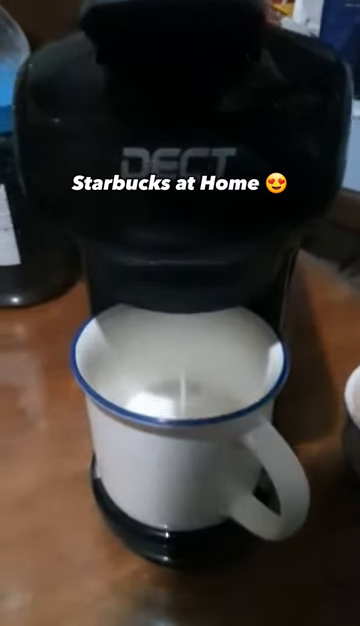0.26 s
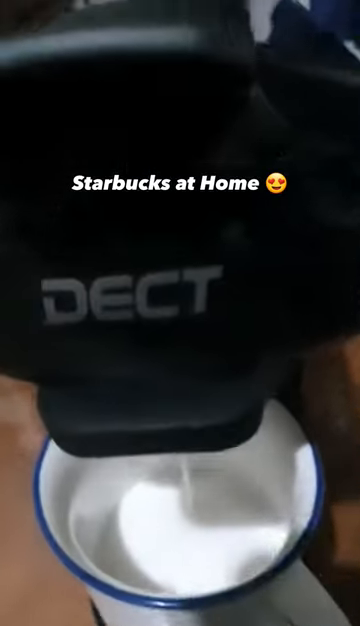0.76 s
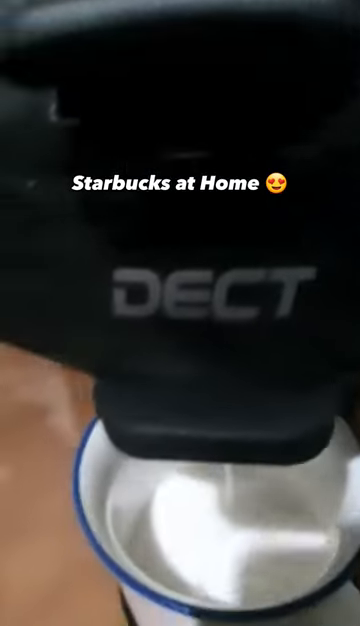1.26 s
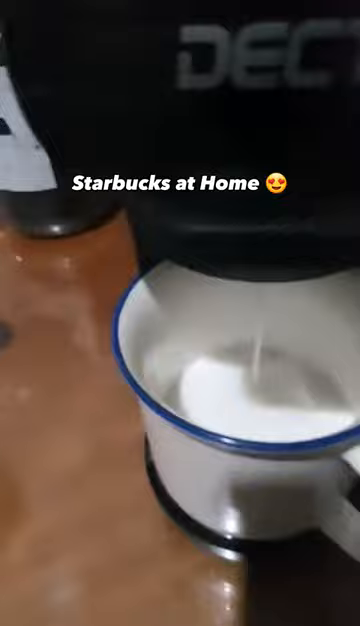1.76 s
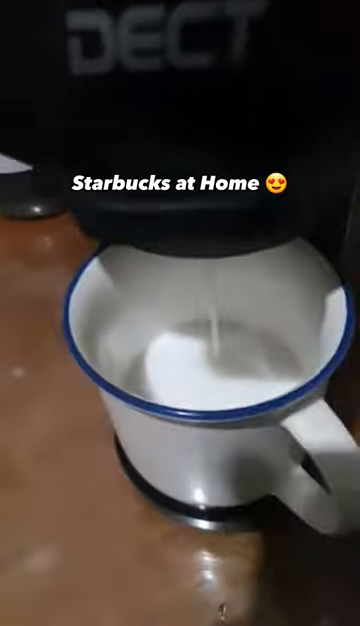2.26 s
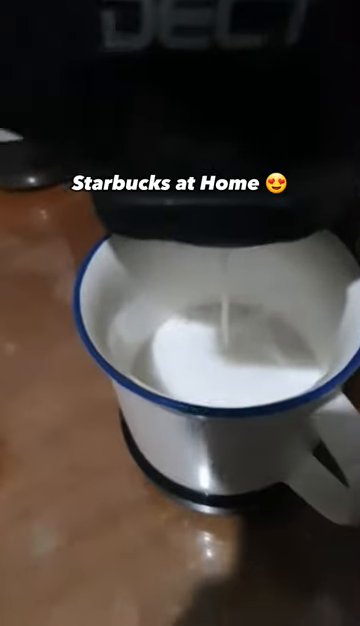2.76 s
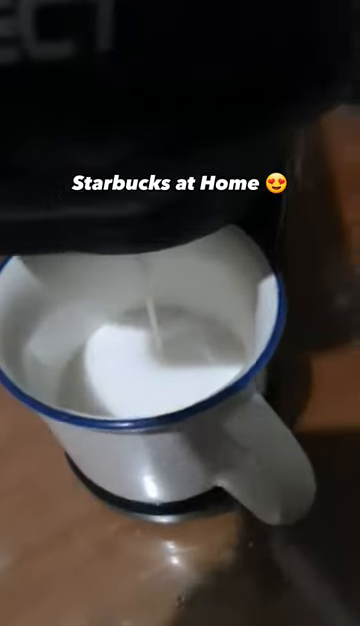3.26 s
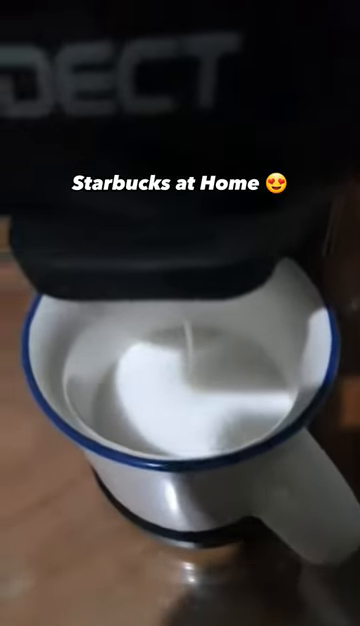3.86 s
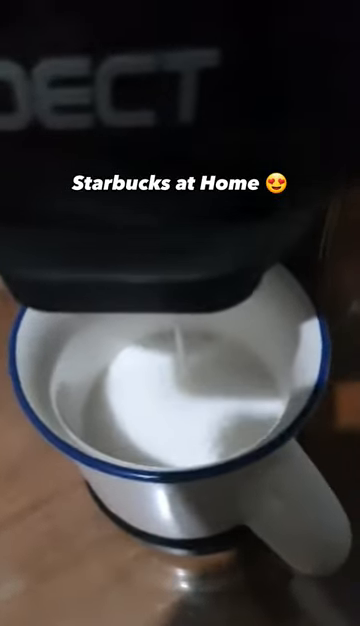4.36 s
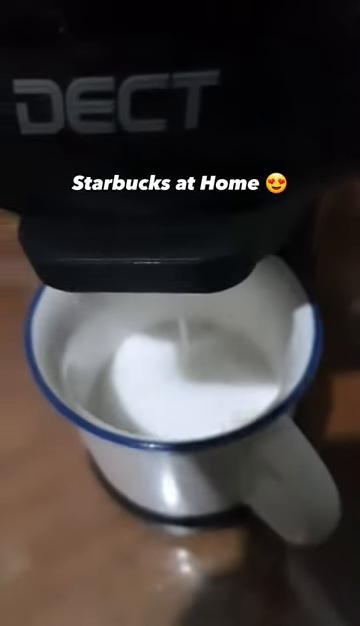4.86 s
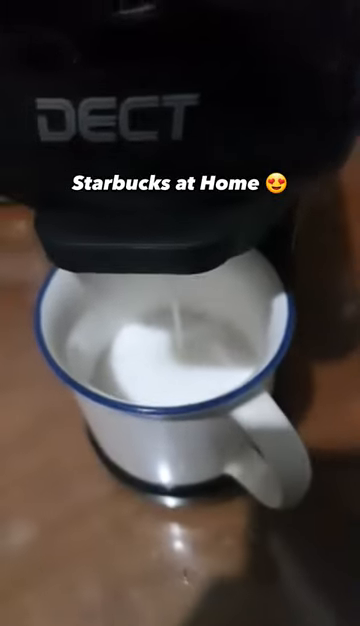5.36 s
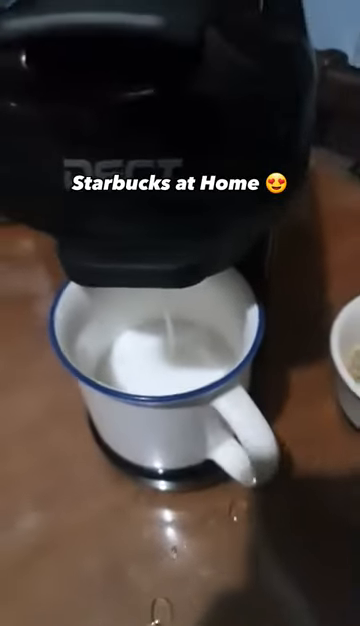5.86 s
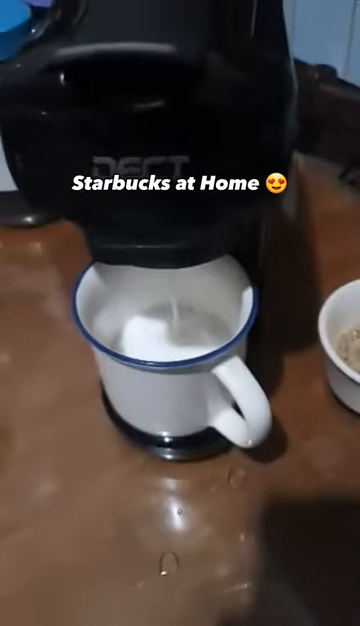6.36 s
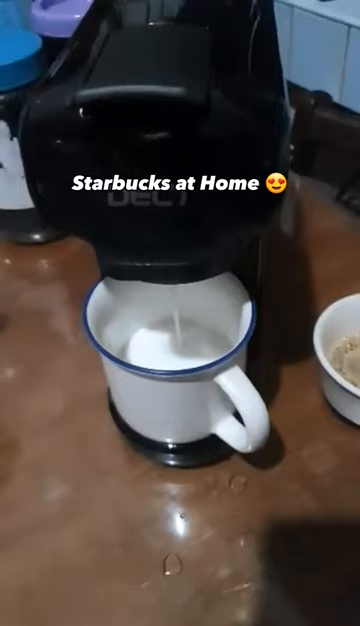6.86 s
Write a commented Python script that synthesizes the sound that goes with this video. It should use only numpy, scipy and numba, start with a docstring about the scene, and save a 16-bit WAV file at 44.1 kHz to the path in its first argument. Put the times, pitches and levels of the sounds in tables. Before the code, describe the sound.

A small coffee machine's pump buzzes steadily for the whole seven seconds, a low electric hum with a fine rattle from the housing and a faint metallic ring. Beneath it, a thin stream splashes softly into a mug. The hand-held microphone is close and moving, so the tone shifts slightly, with a faint handling rumble and soft bumps near 0.4 and 1.2 seconds. Between about 3 and 4.2 seconds, a few short plops fall into the mug, the clearest at 3.7, with faint gurgles and ticks. At 4.3 seconds, one sharp, very loud click pops on the right side of the microphone. Everything drops in level for about a second, then gradually recovers. Several dull, low bumps on the counter come between 5.7 and 6.6 seconds, the strongest near 6.1, along with faint gurgles. The buzz and trickle continue to the end.

```python
"""A vibrating pump in a small coffee machine buzzes at mains rate, each piston blow rattling the housing.
A thin stream splashes, plops and gurgles into a mug, with faint ticks and dull bumps on the counter.
A hand-held two-microphone phone moves from the front to above, close and back, its grip rumbling.
A fingertip pops the right port shut once; the phone's gain control ducks and later recovers."""
import sys
import numpy as np
from scipy import signal
from scipy.fft import rfft, irfft, next_fast_len
from scipy.io import wavfile
from scipy.ndimage import uniform_filter1d, minimum_filter1d, map_coordinates
from numba import njit

SR = 44100
rng = np.random.default_rng(int(sys.argv[2]) if len(sys.argv) > 2 else 0)


def wav_record(signal):
    """Record a signal, one row per channel, as 16-bit PCM in the file named by sys.argv[1]."""
    frames = np.transpose(np.atleast_2d(signal))
    bounded = np.clip(frames, -1, 1)
    # unit amplitude maps onto the largest positive 16-bit level
    quanta = np.round(bounded * 32767).astype(np.int16)
    wavfile.write(sys.argv[1], SR, quanta)


N = 313110
TIME_S = np.arange(N) / SR
FFT_SIZE, STEP = next_fast_len(N), 64
CONTROL_S = np.arange(N // STEP + 2) * STEP / SR
PUMP_HZ, STRIKE_CYCLES, KNOCK_LAG_CYCLES = 60.335, .61, .275

# Harmonics 1 up, each column x4 (front, above, close, back): left_db, right_db, left_lead_rad
PUMP_HARMONICS = [(-69.0, -64.5, -66.0, -67, -74, -64, -65.0, -70, -0.5, 0.5, -0.1, -1.5),
                  (-52, -48.5, -42.5, -44.0, -52.5, -50.5, -43.5, -44.0, 0.2, -0.0, -0.0, -0.73),
                  (-82, -82.5, -78.5, -73, -79, -69.5, -81.5, -74, 3, 5, 4, -3),
                  (-56.5, -54.5, -53.0, -57.5, -58, -58, -56.5, -56, 0, -0.1, 0.1, -1),
                  (-54, -51.5, -48.0, -52.5, -55, -53, -49.5, -52, -0.0, -0.15, 0.4, 0.14),
                  (-58.5, -55.5, -46.0, -57, -57, -56.5, -49.0, -55.5, 1.2, 0.65, 0.3, -0.5),
                  (-54, -48.5, -48.5, -52, -54.5, -49, -50.5, -52.5, -0.3, 0.0, 0.4, 0.6),
                  (-61.5, -63.5, -70.5, -65.5, -67, -61, -67.0, -72, 0.5, 0.5, 0.3, -3),
                  (-57.5, -54, -53.0, -57, -55.5, -54.0, -56, -55.5, 0.7, -0.2, 1.0, 0.86),
                  (-60, -65, -60, -63, -60, -56, -58, -64, 0.3, 1.5, 1.34, 1.5),
                  (-57, -57, -58, -57.5, -60, -59.5, -57, -61.5, -0.5, 0, 0.5, 0.5),
                  (-64, -66, -58.5, -58, -61, -61, -57.5, -67, 1, 3.5, 3, 2),
                  (-69, -63.5, -60.5, -72, -58.5, -60, -56.5, -59.5, 0.8, 1.7, 1.7, 1.4),
                  (-63.0, -58.5, -60.5, -75, -61, -58, -62.5, -85, 0.5, 0.6, 3.5, 2.5),
                  (-66, -59.5, -60.0, -66.5, -74.0, -75.0, -66, -76, 2, 1, 1.1, -1.4),
                  (-63.5, -52.0, -57, -63.5, -61.5, -54.5, -61, -65, -0.5, 0, 0.47, 0.7),
                  (-56, -54, -49, -58, -62, -56.5, -60, -60, -1, 0.5, 0.9, 0.0),
                  (-50.5, -49.5, -45.0, -50.5, -61, -51, -50, -51.0, -4, -0.2, 0.63, 0.1),
                  (-66, -71, -60.5, -62, -68, -60, -58, -59.5, -2, -2, 0.0, 0.5),
                  (-62, -66.0, -76.0, -61, -57, -59, -67.5, -57, -3.5, -1.5, -3, 1.5),
                  (-67, -78, -71.5, -64, -65.0, -65.5, -60, -57.5, 1.2, -3, -3.5, -5.5),
                  (-62, -66, -62.5, -70, -56.5, -59, -65, -60.0, 1.5, 4.5, 0, 1.9),
                  (-72, -74, -77, -77, -76, -79, -75, -70, -1, -2, -6, -7.5),
                  (-89, -74, -65.5, -74, -62.5, -76, -68, -70.0, -1, 1, 4, 2),
                  (-80, -81.5, -76.5, -78, -68, -63, -60, -61, 0.5, -0.7, -0.6, -3),
                  (-76.0, -71.5, -69.0, -81.5, -74, -68.5, -84, -79, -3, -2.5, -2, -1),
                  (-79.0, -75.5, -82.0, -75, -67.5, -62, -76, -65, -0.5, 0.5, 1, 2),
                  (-82.0, -74.0, -74, -89.5, -77.0, -69.5, -71.5, -67.5, 2, 1.5, 1.4, -0.5),
                  (-92.0, -85.0, -85, -77, -86.0, -77, -74.5, -77, -1, 3, 9.5, 11),
                  (-77, -85, -82.0, -77, -73.5, -68, -61.5, -67, -0.5, 0.5, 0.5, -1),
                  (-84.5, -87.0, -75, -82.5, -80, -81, -68, -78, -1, -2.5, -2, 0),
                  (-70, -72, -69, -83, -63, -63, -61, -67, -2.4, -1, 1.4, 0),
                  (-84.5, -73, -72, -74, -83, -71, -72, -76, -3.0, -3.5, -2, -4),
                  (-78.0, -74.0, -68, -74.0, -83.0, -76.5, -73.0, -75.5, -0.5, -2.4, -1.7, -2),
                  (-79, -90.5, -74.5, -73.0, -81.0, -78.5, -75.5, -74, 1.0, 1.9, 2.5, 3.5),
                  (-76.0, -74, -76.5, -89.0, -80.5, -74.5, -73, -72, -3, 1, 1.3, 4),
                  (-94, -79.0, -82.5, -92, -91, -77.5, -83, -82.0, -8, 0, 3.5, 5),
                  (-75, -79, -71, -70, -87.0, -83, -76.0, -80, -3, 1, 2.7, 0.5),
                  (-92.0, -92.0, -92, -92.0, -92.0, -92.0, -81, -79, 0.1, -5, -5, -5.2),
                  (-87.0, -92.0, -73.0, -86.0, -72, -81.5, -74.5, -78.5, 2.5, 2.3, 5.5, 7.5),
                  (-86.0, -88.0, -89, -83, -91.5, -83, -84, -85, 3.1, 0.1, 3.1, 1),
                  (-90, -77.0, -81.0, -77.5, -71, -78, -78, -72, 2, 3.5, 2.9, 1.8),
                  (-77.0, -82.0, -86, -78, -78.0, -82, -79, -69, 1, -1, 1.5, 3),
                  (-81, -80, -80.0, -80, -70.5, -69, -68, -70, 1.0, 1, 2.1, 0.7),
                  (-92.0, -92.0, -89, -92.0, -78, -72, -76.5, -79, 5, 2.0, 0.7, 1.5),
                  (-92.0, -92.0, -83, -88, -76.5, -73.0, -73.5, -74, -3, -4.9, -2.3, -1),
                  (-92, -92.0, -87, -92.0, -87.0, -87, -87, -89.5, 5, 1.3, 2.9, 0.8),
                  (-89.5, -91.5, -92.0, -90, -79, -74, -74.5, -83.0, -1, -2, -2, -2)]
# Phone distance beyond its closest: time_s, distance_m
EXTRA_DISTANCE = [(0, .16), (.5, .09), (.9, .02), (2.5, .02), (3, 0), (4.2, 0), (5, .06), (5.8, .13),
                  (7.1, .26)]


def pump(place, hum_db, wander_db=0.035, blow_db=0.26, jitter_cycles=0.0011):
    """One piston blow per mains cycle, uneven in force and timing, makes a harmonic buzz."""
    table = np.array(PUMP_HARMONICS)
    travel_cycles = curve(CONTROL_S, EXTRA_DISTANCE) / 343 * PUMP_HZ - .004
    place, hum_db = (np.interp(CONTROL_S, TIME_S, track) for track in (place, hum_db))
    force, timing = [slow(40), slow(40)], [slow(28), slow(30)]
    amplitudes = []
    for k, (row, rad) in enumerate(zip(table, blow_phases(table)), 1):
        upper = int(k > 11)  # low and high harmonics vary separately
        db = np.array([at_place(place, row[:4]), at_place(place, row[4:8])])
        db = db + hum_db * (k < 3) + wander_db * k * slow(5) + blow_db * force[upper] * (k > 3)
        shift_cycles = jitter_cycles * timing[upper] - travel_cycles
        phase = rad + .004 * k * slow(9.3) + 2 * np.pi * k * shift_cycles
        port_rad = at_place(place, row[8:]) * np.array([[1], [0]] if k > 19 else [[.5], [-.5]])
        amplitudes.append(undb(db) * np.exp(1j * (phase + port_rad)))
    return np.sqrt(2) * sum_harmonics(np.array(amplitudes), 2 * np.pi * PUMP_HZ / SR, N, STEP)


def blow_phases(table):
    """Harmonic phases of a blow: the housing rings, then a clack, tap, knock and low thud follow."""
    k = np.arange(len(table)) + 1
    close_db = np.interp(np.arange(65), k, table[:, [2, 6]].mean(axis=1), right=-95)
    cepstrum = irfft(np.log(undb(close_db)))
    cepstrum[1:64] *= 2
    cepstrum[65:] = 0  # minimum phase: a causal decay

    def pulse(rad, lag_cycles):
        return rad - 2 * np.pi * k * (STRIKE_CYCLES + lag_cycles)

    # the 14th harmonic, near 850 Hz, has its sign flipped
    ring = pulse(3.3, .03 * (k > 14)) + rfft(cepstrum).imag[k] + np.pi * (k == 14)
    clack, tap = pulse(3., .05), pulse(3., .19)
    # the side wall flips between its resonances near 1.7 and 2.3 kHz
    knock = pulse(2.25, KNOCK_LAG_CYCLES) + np.pi * (k > 28) * (k < 39)
    # turned and smeared above the resonance of the rubber mounts
    thud = pulse(-2.25, .434) + (k > 2) * (3.85 - .2 * (k - 6) ** 2)
    return np.select([k > 27, k > 19, k > 11, k > 7], [knock, clack, ring, tap], thud)


# Panel bands: centre_hz, width_hz, front_db, above_db, close_db, back_db, left_over_right_db, lag_cycles
PANEL_BANDS = [(373, 59, -65.5, -64, -62, -61.5, 0, -0.05), (740, 63, -63, -66, -66, -72, -3, -0.077),
               (1096, 70, -67, -64, -62, -65, -2, .03), (1280, 110, -65.5, -71, -73, -62, -5, 0.028),
               (2620, 150, -73, -72, -75, -69, -2.5, 0.29), (3295, 230, -86, -76, -73, -78, 1.5, -0.15),
               (3890, 99, -78, -86, -89, -79, 13, .05), (3940, 170, -83, -77.5, -74.5, -77, 6, -0.063),
               (5190, 350, -82.5, -80.5, -79, -85.5, 15, -0.11),
               (6320, 340, -87, -79.5, -78.5, -84, -2.5, 0)]


def rattle(place):
    """Loose panels ring with noise on each stroke; the high ones tick shorter."""
    out = 0
    for hz, width_hz, *place_db, pan_db, lag_cycles in PANEL_BANDS:
        rest, fade_cycles, rise_cycles = (.2, .32, .14) if hz < 3000 else (.5, .16, .07)
        gain = undb(at_place(place, place_db) + 1.4 * walk(9.1)) * pan(pan_db)
        noise = noise_band(hz, width_hz, correlation=float(hz < 2000))
        out += gain * noise * stroke(rest, fade_cycles, lag_cycles, rise_cycles)
    return out


# Metal part level: front_db, above_db, close_db, back_db
METAL_LEVELS = [-62, -79, -85, -71]


def metal_ring(place, pitch_hz=3855, t60_s=0.038, lag_cycles=0.0598, scatter_db=2.5, scatter_hz=14):
    """A small metal part, struck on every stroke, rings until the next; loudest from the front."""
    cycles = PUMP_HZ * TIME_S - STRIKE_CYCLES - lag_cycles + 1
    blow, age_s = cycles.astype(int), cycles % 1 / PUMP_HZ
    detune, force = rng.standard_normal((blow.max() + 1, 2))[blow].T
    envelope = np.minimum(age_s / 0.0012, 1) * decay(age_s, t60_s)
    tone = envelope * np.sin(2 * np.pi * (pitch_hz + scatter_hz * detune) * age_s)
    return tone * undb(at_place(place, METAL_LEVELS) + scatter_db * force) * pan(13)


# Spectral shape of stream, housing and room: frequency_hz, left_relative_db, right_relative_db
STREAM_SPECTRUM = [(35, -13, -12), (87, -10, -6), (150, -12.5, -9), (452, -16, -13), (885, -15, -13.5),
                   (1255, -11, -10.5), (1470, -21.5, -14.5), (1960, -17, -17.5), (3100, -28, -24.5),
                   (3880, -28, -32), (6620, -38, -49), (7160, -54, -56), (9730, -36.5, -31.5),
                   (11430, -51, -37), (12000, -52, -55.5)]
# Noise likeness at the two ports: frequency_hz, correlation
PORT_CORRELATION = [(60, 1), (270, 0.68), (600, 0.83), (1250, 0.51), (2600, .0), (12000, 0)]


def stream(splash_db, hiss_db, rms_db=-53, swell_db=-0.44, flicker_db=1.24):
    """Octaves of splash and hiss swell and flicker; those at 1-4 kHz throb with the stroke."""
    hz = np.fft.rfftfreq(FFT_SIZE, 1 / SR) + 1
    octaves = np.log2(hz)

    def per_bin(table, column):
        table = np.array(table)
        return np.interp(octaves, np.log2(table[:, 0]), table[:, column])

    correlation = per_bin(PORT_CORRELATION, 1)
    mid, side = white_pair() * np.sqrt([1 + correlation, 1 - correlation])
    spectra = np.array([mid + side, mid - side]) * undb([per_bin(STREAM_SPECTRUM, n) for n in (1, 2)])
    out, swell = 0, walk(2.73)
    for octave in range(5, 14):
        if octave < 13:
            share = np.clip(1 - np.abs(octaves - octave), 0, 1)
            db = bell(octave, 9.3, 2.0) * splash_db + swell_db * swell
        else:
            share = np.clip(octaves - 12, 0, 1)
            db = hiss_db + 1.5 * walk(20)
        part = irfft(spectra * share, FFT_SIZE)[:, :N] * undb(db + flicker_db * walk(12))
        if 9 < octave < 13:
            part *= stroke(rest=.7, fade_cycles=.4, lag_cycles=KNOCK_LAG_CYCLES * (octave == 11))
        out += part
    return out / out.std() * undb(rms_db)


# Drops in the mug: start_s, level_db, pitch_hz, left_over_right_db
MUG_DROPS = [(3.0765, -38, 800, -3), (3.6752, -25.5, 760, -3), (3.7475, -34, 786, -2),
             (4.1858, -34, 770, -1), (4.1932, -33, 735, 0), (4.2365, -39, 760, 1)]
# Gurgles in the mug: start_s, level_db, pitch_hz, left_over_right_db
MUG_GURGLES = [(3.17, -54, 455, 5), (3.25, -52, 483, 7), (6.27, -53, 698, 3), (6.42, -56, 716, 0),
               (6.52, -57, 745, 0)]


def mug():
    """Drops plop briefly; softer gurgles ring on and rise in pitch."""
    drops = rings(MUG_DROPS, t60_s=0.017, rise_ms=1.0, glide=0.037, left_lead_ms=0.3, left_decay=0.55)
    return drops + rings(MUG_GURGLES, t60_s=0.16, rise_ms=25.0, glide=0.083)


# Case and port cavity modes: pitch_hz, relative_db, t60_s
PORT_MODES = [(2550, -27.5, .008), (3530, -19, 0.0063), (4240, -29, .004), (5400, -26, 0.0033)]
# Low thump of the pop: pitch_hz, relative_db, t60_s
POP_THUMP = (52, -16, .055)


def finger_pop(start_s=4.3269, level_db=15, rise_ms=0.043, notch_delay_ms=0.072):
    """A fingertip seals the right port: a sharp pressure step, a low thump and a short ring."""
    age_s = np.maximum(TIME_S - start_s, 0)
    # averaging with a delayed copy dulls the step: the microphone's notch near 7 kHz
    rise = np.maximum([age_s * 1000, age_s * 1000 - notch_delay_ms], 0) / rise_ms
    pressure = np.mean(1 - (1 + rise) * np.exp(-rise), axis=0)

    def mode(hz, db, t60_s):
        return undb(db) * decay(age_s, t60_s) * np.sin(2 * np.pi * hz * age_s)

    ringing = sum(mode(*row) for row in PORT_MODES) - mode(*POP_THUMP)
    return np.array([np.zeros(N), -undb(level_db) * pressure * (1 + ringing)])


# Bumps on the counter: start_s, level_db, pitch_hz, left_over_right_db
COUNTER_BUMPS = [(.449, -43, 186, 0), (1.201, -45.5, 170, -12), (5.732, -57, 190, 0), (5.775, -43, 310, 0),
                 (5.90, -44, 318, 0), (5.96, -46, 320, 0), (6.025, -47, 320, 0), (6.091, -32.5, 181, 0),
                 (6.225, -41, 240, 0), (6.265, -42, 270, 0), (6.572, -39, 180, 0)]


def bumps():
    """The counter is bumped: dull, low rings that sag in pitch."""
    return rings(COUNTER_BUMPS, t60_s=0.043, rise_ms=1.7, glide=-0.11)


# Ticks: start_s, level_db, pitch_hz, left_over_right_db
FAINT_TICKS = [(3.0752, -47, 2900, 2), (3.6749, -47, 3800, 2), (5.4390, -43, 2500, 0)]


def ticks():
    """Faint, high rings that die at once."""
    return rings(FAINT_TICKS, t60_s=.003, rise_ms=.15, glide=0)


# Shifts of the grip: centre_s, level_db, width_s
GRIP_SHIFTS = [(.55, -59, .1), (1.07, -57, .05), (1.255, -39, .1), (1.73, -50, 0.081), (2.12, -52, 0.066),
               (2.383, -46.5, 0.13), (2.75, -52, 0.12), (4.312, -52, 0.18), (5.556, -42, 0.035),
               (6.028, -48, 0.13), (6.5, -55, 0.1), (6.76, -62, 0.055)]


def hand_rumble(rest_db=-57.5):
    """Grip and air at the ports: a lumpy rumble, stronger on the right, swelling as the grip shifts."""
    gain = undb(rest_db) + sum(undb(db) * bell(TIME_S, s, width_s) for s, db, width_s in GRIP_SHIFTS)
    rumble = noise_band(34.7, 28, correlation=0.26) * undb([[-3.0], [1.0]])
    return rumble * gain * undb(1.6 * walk(20))


def rings(table, t60_s, rise_ms, glide, left_lead_ms=0., left_decay=0.89):
    """One damped, gliding mode per event; the left port may hear it sooner and shorter."""
    out, t = np.zeros((2, N)), np.arange(int(.2 * SR)) / SR
    age_s = np.maximum([t, t - left_lead_ms / 1000], 0)
    envelope = (1 - np.exp(-age_s * 1000 / rise_ms)) * decay(age_s / [[left_decay], [1]], t60_s)
    envelope /= envelope.max(axis=1, keepdims=True)
    for start_s, db, hz, pan_db in table:
        tone = np.sin(2 * np.pi * hz * (age_s + glide * age_s ** 2 / t60_s))
        start = int(start_s * SR)
        out[:, start:start + len(t)] += undb(db) * pan(pan_db) * envelope * tone
    return out


@njit
def sum_harmonics(amplitudes, rad_per_sample, count, step):
    """Harmonic oscillators with complex amplitudes [harmonic, port, control point], ramped linearly."""
    out = np.zeros((2, count))
    for k in range(len(amplitudes)):
        for port in range(2):
            points = amplitudes[k, port]
            phasor, turn = 1. + 0j, np.exp(1j * (k + 1) * rad_per_sample)
            for i in range(count):
                j = i // step
                amplitude = points[j] + (points[j + 1] - points[j]) * (i % step / step)
                out[port, i] += (phasor * amplitude).real
                phasor *= turn
    return out


def stroke(rest, fade_cycles, lag_cycles, rise_cycles=0.16):
    """Unit-rms gain that jumps once per pump cycle and fades towards rest."""
    age_cycles = (PUMP_HZ * TIME_S - STRIKE_CYCLES - lag_cycles) % 1
    gain = rest + np.exp(-age_cycles / fade_cycles) * np.minimum(age_cycles / rise_cycles, 1)
    return gain / np.sqrt(np.mean(gain ** 2))


def noise_band(hz, width_hz, correlation):
    """Unit-rms two-port noise in a bell-shaped band."""
    mid, side = white_pair() * bell(np.fft.rfftfreq(FFT_SIZE, 1 / SR), hz, width_hz)
    mid, side = mid * np.sqrt(1 + correlation), side * np.sqrt(1 - correlation)
    noise = irfft([mid + side, mid - side], FFT_SIZE)[:, :N]
    return noise / noise.std()


def white_pair():
    """Spectra of two independent white noises."""
    shape = (2, FFT_SIZE // 2 + 1)
    return rng.standard_normal(shape) + 1j * rng.standard_normal(shape)


def slow(rate_hz):
    """Smooth random drift at control rate, spread near 1."""
    points = rng.standard_normal(int(N / SR * rate_hz) + 4)
    return map_coordinates(points, [CONTROL_S * rate_hz], order=2)


def walk(rate_hz):
    """Smooth random drift at audio rate."""
    return np.interp(TIME_S, CONTROL_S, slow(rate_hz))


def at_place(place, values):
    """Blend four values along the loop front, above, close, back, front."""
    return np.interp(place, range(5), np.append(values, values[0]))


def curve(time_s, table):
    return np.interp(time_s, *np.transpose(table))


def bell(x, centre, width):
    return np.exp(-.5 * ((x - centre) / width) ** 2)


def decay(age_s, t60_s):
    return np.exp(-np.log(1000) * age_s / t60_s)


def pan(left_over_right_db):
    return undb([[left_over_right_db / 2], [-left_over_right_db / 2]])


def undb(db):
    return 10 ** (np.asarray(db) / 20)


# Phone path: time_s, place (0 front, 1 above, 2 close, 3 back, 4 front again)
PHONE_PATH = [(0, 0), (.3, 0), (.52, .7), (1.05, 1), (1.72, 1.15), (1.9, 2), (5, 2), (5.8, 2.5), (6, 3),
              (6.55, 3), (6.75, 3.45), (7.1, 3.5)]
# Level offsets as the phone moves: time_s, pump_db, hum_db, splash_db, hiss_db
PATH_LEVELS = [(0, -0.4, 1.5, -4, -2), (.55, -2.5, 2.5, -0.5, -0.5), (1.1, -1, -1, -0.5, 1),
               (1.35, -0.5, 2, 1.5, 4), (1.72, -0.2, 1.5, 3, 1), (2.1, -0.5, -2.5, 3.5, -0.5),
               (2.6, -1, -1.5, 1, -2), (2.85, -0.5, 1, 1.5, 1.5), (3.5, -0.66, 0.5, 2.5, -2.5),
               (4.3, -0.6, 1, 2, 3.5), (5.0, -0.5, 0.8, 0.2, 2), (5.7, 0.1, 0.5, 1.5, -1.5),
               (6.0, 3.5, -0.5, 5, 0.5), (6.3, 1.2, -1, 6.5, 0), (6.7, 0.1, 2, -1, -5.5),
               (7.1, -1.5, 5, -2.5, -5)]


def scene():
    """All sources as the two ports hear them."""
    place = curve(TIME_S, PHONE_PATH)
    times_s, *columns = np.transpose(PATH_LEVELS)
    pump_db, hum_db, splash_db, hiss_db = (np.interp(TIME_S, times_s, db) for db in columns)
    machine = undb(pump_db) * pump(place, hum_db) + rattle(place) + metal_ring(place)
    return machine + stream(splash_db, hiss_db) + mug() + finger_pop() + bumps() + ticks() + hand_rumble()


@njit
def duck(peak, ceiling, ducked_gain, hold_samples, climb_ratio):
    """Gain control: drops at an overload, holds, then climbs back."""
    gain, level, wait = np.empty(len(peak)), 1., 0.
    for i in range(len(peak)):
        if peak[i] > ceiling:
            level, wait = ducked_gain, hold_samples
        elif wait > 0:
            wait -= 1
        else:
            level = min(level * climb_ratio, 1.)
        gain[i] = level
    return gain


def record(dry, low_hz=56.7, top_hz=12800, ceiling=1.0, drop_db=-6.0, hold_s=1.09, climb_db_per_s=3.5,
           ahead_ms=4.8, release_ms=9.0):
    """The phone: steep bass cut, linked gain control and look-ahead limiter, top cut."""
    x = signal.sosfilt(signal.butter(5, low_hz, "high", fs=SR, output="sos"), dry)
    ahead = int(ahead_ms * SR / 1000)
    peak = -minimum_filter1d(-np.abs(x).max(0), size=2 * ahead + 1)
    gain = duck(peak, ceiling, undb(drop_db), hold_s * SR, undb(climb_db_per_s / SR))
    gain = uniform_filter1d(gain, size=ahead)
    log_limit = uniform_filter1d(np.log(np.minimum(ceiling / (peak * gain), 1)), size=ahead)
    pole = np.exp(-1000 / (release_ms * SR))
    release = 2.74 * signal.lfilter([1 - pole], [1, -pole], log_limit)
    log_limit = np.minimum(log_limit, release).clip(log_limit.min(), 0)
    top_cut = signal.ellip(8, .2, 60, top_hz, fs=SR, output="sos")
    return signal.sosfilt(top_cut, x * gain * np.exp(log_limit))


dry = scene()
out = record(dry)
wav_record(out)
```